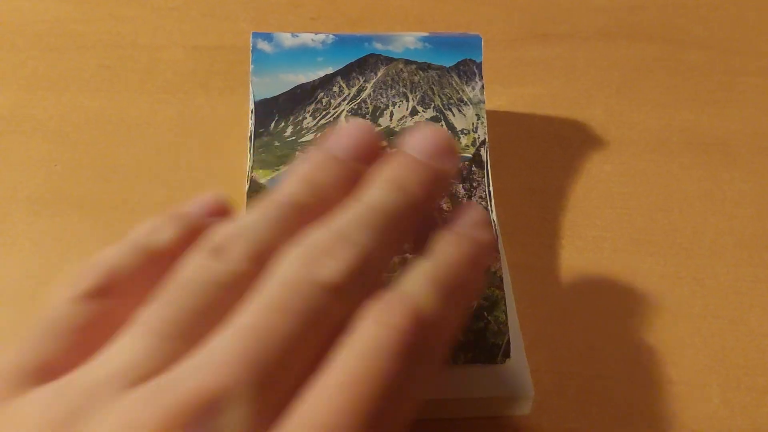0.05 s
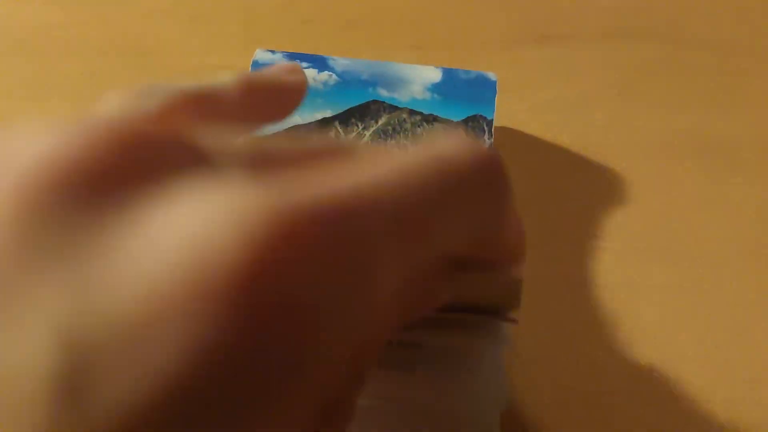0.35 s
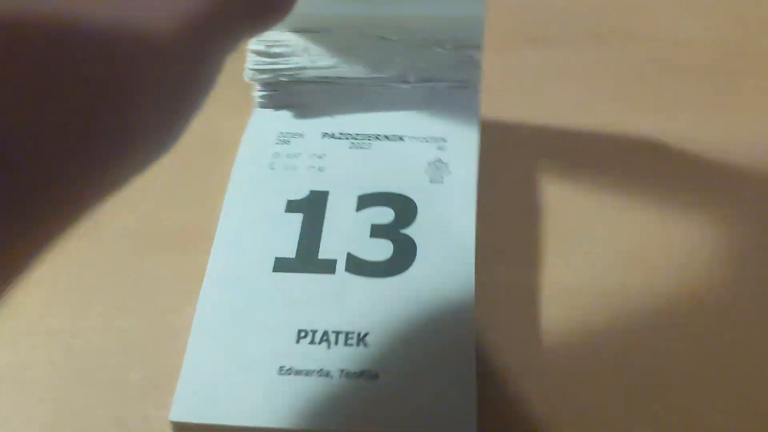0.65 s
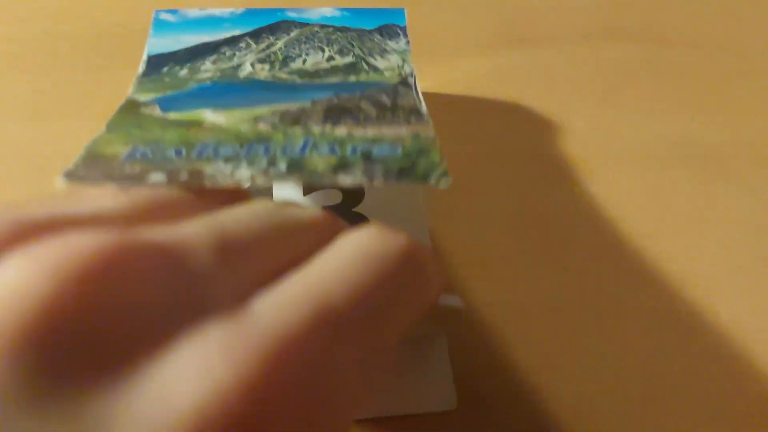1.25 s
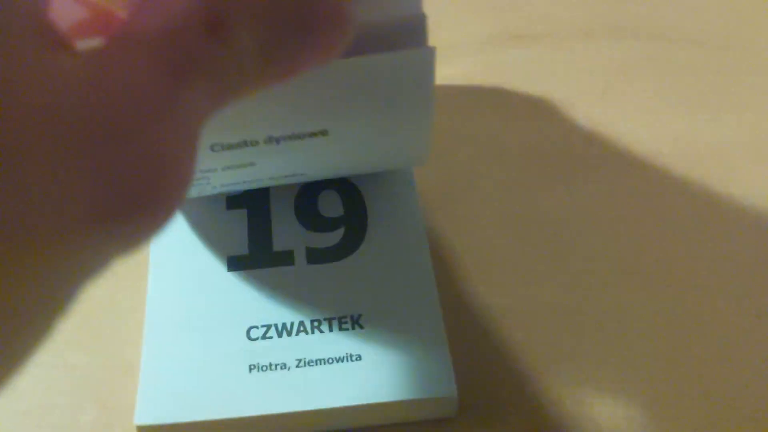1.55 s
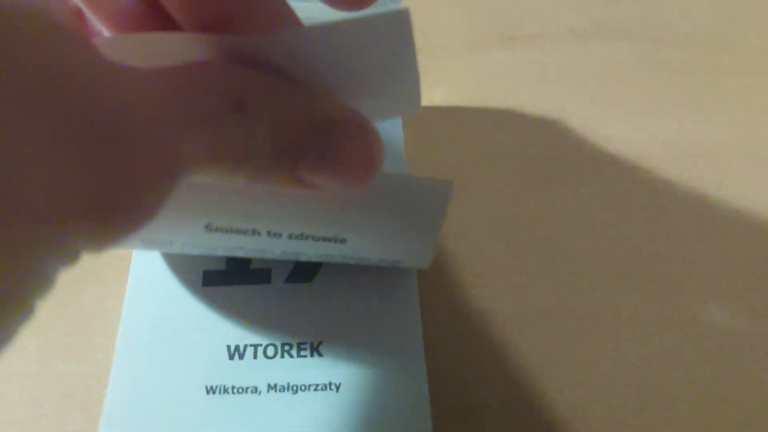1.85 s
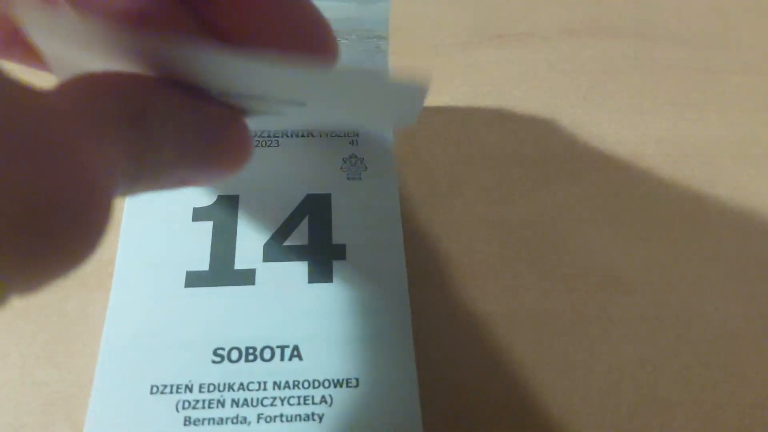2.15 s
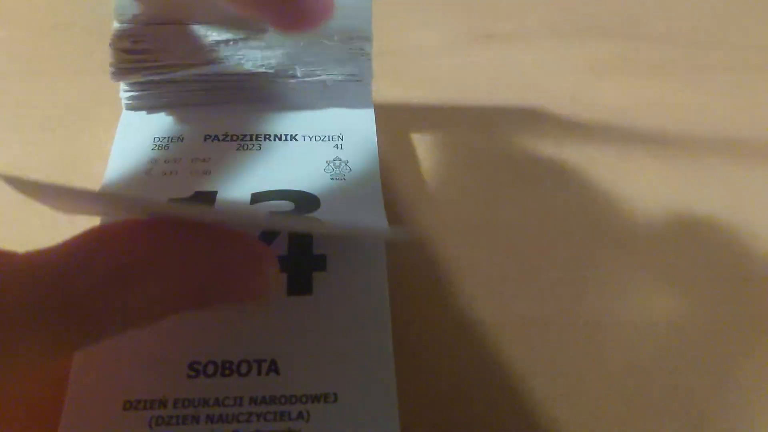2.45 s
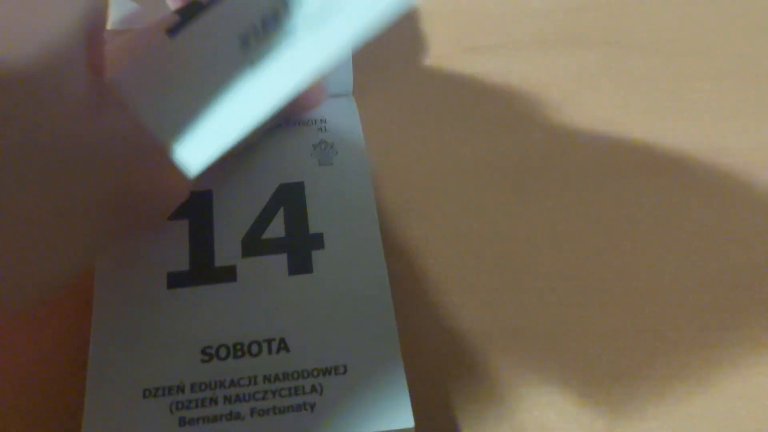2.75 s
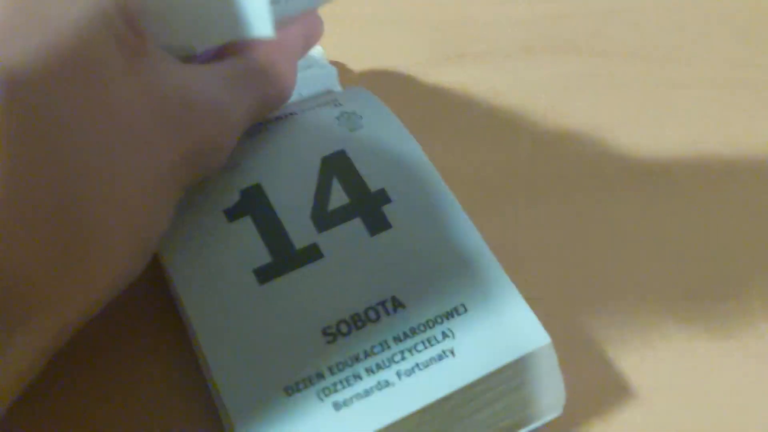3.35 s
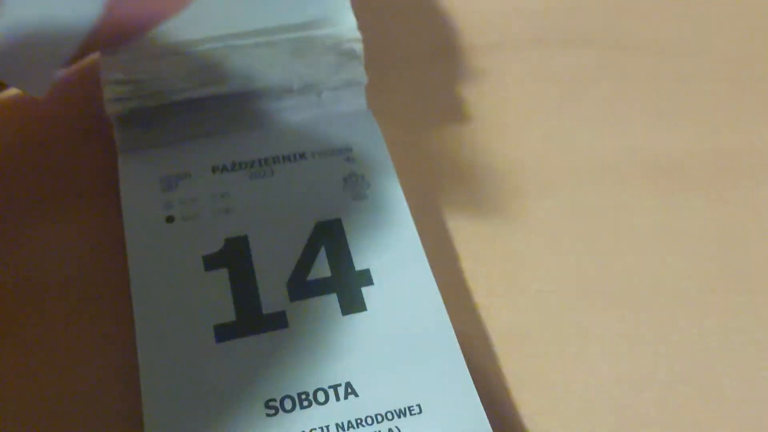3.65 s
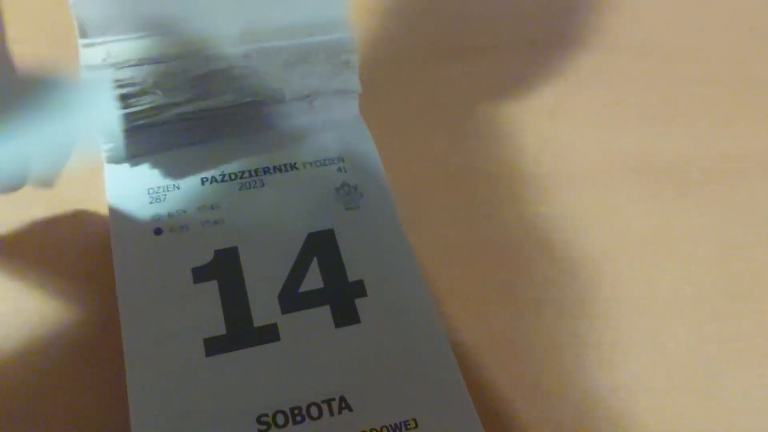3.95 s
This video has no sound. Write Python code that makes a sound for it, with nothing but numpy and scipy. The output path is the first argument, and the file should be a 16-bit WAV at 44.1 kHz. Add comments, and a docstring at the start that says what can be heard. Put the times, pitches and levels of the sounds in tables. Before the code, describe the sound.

Thin paper pages of a tear-off calendar rustle close to the microphone in a small, quiet room. From the start to about 1.2 seconds come soft slides, crisp clicks and light bumps on a wooden table. Pages then swish in uneven strokes until about 3.2. A sheet snaps taut at 3.3 and rips off in a loud crackle from 3.4 to 3.7, sliding free softly around 3.8.

```python
"""In a small room, a tear-off paper calendar is handled on a wooden table, close to a microphone.
Fingers bump the pad, so it thuds and the table rings. They lift the cover and slide through the thin
pages, which rub, hiss and buckle. One sheet is pulled tight, snaps, rips along its binding with a
crackle of breaking fibres and slides free. The microphone has two openings (ports), left and right."""
import sys
import numpy as np
from scipy import signal
from scipy.fft import rfft, irfft, next_fast_len
from scipy.io import wavfile
from scipy.ndimage import map_coordinates

SR = 44100
rng = np.random.default_rng(int(sys.argv[2]) if len(sys.argv) > 2 else 0)


def master_out(mix):
    """Clip the mix to full scale and print it as 16-bit PCM to the path in sys.argv[1]."""
    frames = np.transpose(np.atleast_2d(mix))
    ceiling = np.clip(frames, -1, 1)
    pcm = np.round(ceiling * 32767).astype(np.int16)
    wavfile.write(sys.argv[1], SR, pcm)


N = 176400
T = np.arange(N) / SR

# Levels compare rows within a table. A fade_s is the time a sound takes to drop by 60 dB.
# Tone of the room's air: pitch_hz, level_db
AIR_TONE = [(20, -23.5), (45, 12.5), (70, -2), (130, 1), (200, -10.5), (350, -3.5), (600, -17),
            (1100, -16.5), (1600, -23.5), (2200, -13.5), (3000, -30.5), (4000, -17), (6000, -27),
            (9500, -35), (13000, -23.5), (16000, -31.5)]
# Bumps on the pad and table: start_s, level_db, brightness_hz, thud_fade_s
BUMPS = [(0.07, -49, 90, 0.048), (.163, -43.5, 92, 0.29), (0.22, -53.5, 220, .1), (.557, -49.5, 145.7, 0.3),
         (.735, -35, 606, 0.1), (.752, -36, 1020, 0.069), (.839, -52, 880, 0.045),
         (.964, -38.5, 277.8, 0.15), (1.0, -43.5, 263, 0.37), (1.055, -38.5, 250, 0.086),
         (1.086, -47.5, 180, 0.082), (1.571, -41, 790, 0.17), (1.601, -47, 760, 0.039),
         (1.811, -53, 324, 0.25), (2.222, -50, 960, 0.2), (2.442, -51, 350, 0.055),
         (2.469, -50.5, 890, 0.03), (2.5, -40.5, 474, 0.094), (2.643, -43, 970, 0.086),
         (3.2994, -51, 600, 0.066), (3.372, -21, 580, 0.066), (3.475, -31, 644, 0.074),
         (3.507, -35, 800, 0.043), (3.622, -37, 525, 0.065), (3.636, -32, 710, 0.091)]
# Tone of the pad's thud: pitch_hz, level_db
THUD_TONE = [(25, -38.5), (50, -17), (70, 3), (100, -1), (130, 3), (160, -9.5), (220, 1), (330, 3.5),
             (500, 2.5), (900, 5), (1500, 13.5), (4000, -20.5)]
# Notes at which the table top and pad ring: pitch_hz, level_db, fade_s
TABLE_NOTES = [(74, -23, 0.27), (133, -9.5, 0.24), (172, -30.5, 0.3), (223.5, -7, 0.14),
               (273.7, -17.5, 0.15), (317.8, -11, 0.33), (466, -19.5, 0.069), (631, -16, 0.34),
               (843.4, 0, 0.11), (955, -2, 0.18), (1022, -6, .16)]
# The hand drags on the pad: peak_s, half_length_s, level_db
DRAGS = [(1.504, 0.077, -65), (1.74, 0.14, -67), (2.202, 0.15, -76.5), (2.919, 0.063, -59.5)]
# Tone of that dragging: pitch_hz, level_db
DRAG_TONE = [(120, -14.5), (220, -0.5), (340, 5.5), (430, -14), (600, -23.5), (1500, -33)]
# Sheets sliding: peak_s, rise_s, fall_s, rub_db, ring_hz, ring_db, hiss_db
SLIDES = [(0.149, 0.0062, 0.021, -54.5, 1436, -55, -87), (.25, .05, 0.039, -58, 1383, -64, -68),
          (.365, 0.055, 0.056, -54, 1182, -52, -66), (0.501, 0.028, 0.02, -70, 4050, -68, -63),
          (.6, 0.012, 0.083, -74, 4550, -62.5, -59.5), (.68, 0.079, 0.026, -68, 4270, -83, -58),
          (0.713, 0.01, 0.021, -51, 1155, -41.5, -62.5), (1.039, 0.076, 0.28, -58.5, 4130, -80.5, -64.5),
          (1.244, 0.013, 0.12, -64, 1047, -66, -72), (1.32, 0.0224, 0.034, -57, 3160, -56, -64),
          (1.388, 0.044, 0.031, -42.5, 3400, -41.5, -47), (1.427, 0.022, 0.013, -44.5, 2660, -43.5, -64),
          (1.51, 0.043, 0.085, -55, 2230, -56.5, -58), (1.686, 0.027, 0.036, -42, 3190, -50, -42),
          (1.79, 0.091, 0.049, -50.5, 2150, -97, -47), (1.96, 0.061, 0.042, -51.5, 3250, -65, -52),
          (2.075, 0.066, 0.046, -55, 2413, -55, -48.5), (2.199, 0.051, .045, -44.5, 3090, -48, -45),
          (2.319, 0.024, 0.019, -57, 3290, -54.5, -56.5), (2.55, 0.07, .04, -55.5, 3314, -63, -60.5),
          (2.61, 0.028, 0.045, -59, 3380, -63, -51.5), (2.664, 0.03, 0.039, -50, 3390, -50, -53),
          (2.906, 0.069, 0.043, -50, 2230, -56, -59.5), (3.04, 0.17, 0.096, -54.5, 3460, -66.5, -57.5),
          (3.22, 0.075, 0.093, -61.5, 3410, -65, -62.5), (3.331, .012, 0.024, -43.5, 3740, -46, -48),
          (3.81, 0.055, 0.041, -48, 3860, -58.5, -49)]
# Tone of paper rubbing: pitch_hz, level_db
RUB_TONE = [(100, -10.5), (350, -11.5), (600, -8.5), (1100, 3), (1600, 1), (2250, 7), (2800, -2.5),
            (3400, -2), (4200, -3), (5200, 5.5), (7500, -14.5), (16000, -39.5)]
# Tone of the paper's fine hiss: pitch_hz, level_db
HISS_TONE = [(2000, -18.5), (4500, -2), (6500, -15.5), (8200, -2.5), (9500, -12), (12000, -2.5),
             (15500, -0.5), (17000, -2)]
# The paper buckles or gives way:
# start_s, crack_db, crack_fade_s, pop_hz, pop_db, tick_db, left_treble (0 to 1)
SNAPS = [(0.1446, -52, 0.014, 1440, -40, -75, 0.2), (.5578, -29, 0.015, 2930, -20.5, -31.5, 1),
         (.705, -47, 0.062, 1900, -37, -64, 0.2), (0.7372, -42, .015, 1260, -28, -62, 0.1),
         (.9557, -53, 0.012, 900, -46.5, -58, 0.4), (.9787, -44, .01, 8300, -50, -33, 0.94),
         (1.0545, -50, 0.037, 1370, -34, -65, 0.3), (1.224, -58, 0.024, 1080, -45, -63, 0),
         (1.5728, -49, 0.014, 1120, -32.5, -72, 0.5), (1.7622, -48, 0.045, 1860, -26, -61, 0.9),
         (1.8, -39.5, 0.019, 1110, -68, -42, 1), (2.47, -52, 0.022, 694, -41, -65, 0.7),
         (2.5007, -43, 0.02, 850, -33, -56, 0), (2.9916, -41, 0.022, 3500, -23, -62, .3),
         (3.245, -50.5, 0.03, 3000, -55.5, -50, 0.9), (3.2988, -20, 0.02, 2980, -28, -19.5, 1),
         (3.3709, -12.5, 0.039, 896, -5, -3, .7), (3.4579, -29.5, 0.016, 4030, -31.5, -24, .4),
         (3.465, -39, 0.011, 3950, -22.5, -32, .4), (3.4752, -17, 0.015, 2350, -4, -17.5, 0.1),
         (3.4864, -29.5, 0.019, 1400, -10.5, -30.5, .3), (3.5066, -18, 0.019, 1400, -8.5, -22.5, 1),
         (3.54, -35, .012, 3530, -26.5, -21, 0.8), (3.597, -30.5, 0.015, 4020, -34, -18, 0.65),
         (3.6058, -18.5, 0.012, 3330, -33, -5.5, 0.3), (3.617, -30.5, 0.043, 4550, -26, -25.5, 1),
         (3.6247, -55, 0.015, 3900, -13.5, -22, 0.8), (3.6333, -34, 0.045, 1026, -15.5, -26, 0.5),
         (3.6943, -36.5, .025, 2500, -27, -33, 0.5), (3.771, -45, 0.017, 1185, -34, -56, 0.1)]
# Tone of a snap's bright tick: pitch_hz, level_db
TICK_TONE = [(3000, -32), (5500, -26), (7500, 4), (9500, -10), (12000, -2), (16000, 7.5)]
# Tone of a snap's crack: pitch_hz, level_db
CRACK_TONE = [(40, -32.5), (130, -21), (400, -5), (1200, 2), (2500, 6.5), (4200, 4), (6000, 0.5),
              (8000, -8.5), (9500, -20), (12000, -5), (16000, -27)]
# How late a snap reaches the right port as the fingers move: time_s, delay_ms
SNAP_DELAYS = [(.14, 0.25), (.56, .2), (.74, 0.12), (.98, 0.053), (1.3, 0.23), (2.6, .29), (3, 0.33),
               (3.3, 0.28), (3.37, .18), (3.46, 0.326), (3.8, 0.3)]
# Loudness along the rip: time_s, level_db
RIP_LEVELS = [(3.37, -67), (3.385, -23), (3.42, -42.5), (3.445, -38), (3.49, -30.5), (3.53, -39),
              (3.56, -36), (3.59, -40), (3.63, -26), (3.66, -44), (3.7, -48), (3.73, -56), (3.78, -68)]
# Tone of breaking fibres: pitch_hz, level_db
FIBRE_TONE = [(80, -34.5), (300, -2.5), (700, 1.5), (1200, 8), (2500, -4), (4200, 13), (6000, 3),
              (8000, -3.5), (9500, -8), (12500, 2.5), (16000, 0.5)]
# The left port's extra treble when left_treble is 1: pitch_hz, left_minus_right_db
LEFT_TREBLE = [(4500, -0.5), (6500, 10), (9000, 14), (15000, 1.5)]
# How the two ports colour every sound: pitch_hz, left_minus_right_db
PORT_BALANCE = [(60, 3), (140, 6), (300, -0.5), (800, 3), (1300, -2), (2000, -5.5), (3000, -6.5),
                (4400, -7), (5500, 1)]
# Length of the room's echo: pitch_hz, fade_s
ECHO_FADES = [(80, 0.22), (300, 0.38), (1000, 0.23), (4000, 0.26), (9000, 0.37), (16000, 0.22)]
# Tone of the room's echo: pitch_hz, level_db
ECHO_TONE = [(80, -3.5), (400, -5), (1500, -7), (4000, -6.5), (8000, -9), (15000, -7.5)]

SIDES = np.array([[.5], [-.5]])  # splits an effect: half up on the left, half down on the right


def amp(db):
    """Turn decibels into a number to multiply by."""
    return 10 ** (np.asarray(db) / 20)


def unit(x):
    """Scale a sound to an average (rms) size of 1."""
    return x / np.sqrt(np.mean(x ** 2) + 1e-20)


def along(table, hz):
    """Read between the rows of a table, on a musical (log) pitch scale."""
    pitches, values = np.transpose(table)
    return np.interp(np.log(hz + 1), np.log(pitches + 1), values)


def tone(table):
    """Turn a tone table into a curve that gives the gain at each pitch."""
    return lambda f: amp(along(table, f))


def filtered(x, curve):
    """Turn each pitch in a sound up or down by a curve."""
    n = x.shape[-1]
    padded = next_fast_len(n + 4096)
    return irfft(rfft(x, padded) * curve(np.fft.rfftfreq(padded, 1 / SR)), padded)[..., :n]


def noise(curve, size=N):
    """Steady noise shaped by a curve."""
    return unit(filtered(rng.standard_normal(size), curve))


def burst(curve, fade_s, size):
    """A dying puff of noise, evened out across pitch and then shaped by a curve."""
    fade = amp(-60 * T[:size] / fade_s)
    spectrum = rfft(np.pad(fade * rng.standard_normal(size), (0, size)))
    even = spectrum / (np.abs(spectrum) + 1e-12)
    puff = irfft(even * curve(np.fft.rfftfreq(2 * size, 1 / SR)))[:size] * fade ** 0.033
    return puff * np.linalg.norm(fade) / np.linalg.norm(puff)


def wobble(per_s):
    """A smooth line through per_s random values each second."""
    return map_coordinates(rng.standard_normal(N // 8), [T * per_s], mode="wrap")


def add(track, start_s, x):
    """Mix a sound into the track at start_s, or at 0 if that is negative."""
    part = track[..., max(round(start_s * SR), 0):][..., :x.shape[-1]]
    part += x[..., :part.shape[-1]]


def ports(x, delay_ms, left_treble):
    """Make a sound stereo: the right port hears it later and with less treble."""
    balance = lambda f: amp(SIDES * left_treble * along(LEFT_TREBLE, f))
    delay = lambda f: np.exp(2j * np.pi * SIDES * f * delay_ms / 1000)
    return filtered(x, lambda f: balance(f) * delay(f))


def room_air():
    """Quiet air in the room, partly shared by both ports."""
    shared, left, right = [noise(tone(AIR_TONE)) for _ in range(3)]
    return amp(-65) * unit(shared + 1.1 * np.array([left, right]))


def hand_on_pad():
    """Bumps make the pad thud and the table ring, duller when soft; a dragging hand adds a low rub."""
    t = T[:SR // 2]
    drag_level = sum(amp(db) * np.exp(-((T - peak_s) / half_s) ** 4) for peak_s, half_s, db in DRAGS)
    out = noise(tone(DRAG_TONE)) * drag_level
    attack = 1 - np.exp(-t / 0.00018)
    for start_s, level_db, brightness_hz, fade_s in BUMPS:
        soften = lambda f: 1 / (1 + (f / brightness_hz) ** 3)
        thud = amp(-3.5) * burst(lambda f: tone(THUD_TONE)(f) * soften(f), fade_s, len(t))
        ring = np.zeros(len(t))
        for hz, note_db, note_fade_s in TABLE_NOTES:
            fade = amp(note_db - 5 + rng.normal(0, 0.53) - 60 * t / note_fade_s)
            ring += soften(hz) * fade * np.sin(2 * np.pi * (hz * t + rng.random()))
        add(out, start_s, amp(level_db) * (thud + ring) * attack)
    return ports(out, delay_ms=0.16, left_treble=0.77)


def sheet_ring(hz, sharpness=9, sink_octaves_per_s=.5):
    """One second of a bent sheet's noisy note, which sinks as the sheet slides out."""
    slow = lambda f: 1 / (1 + (2 * sharpness * f / hz) ** 1.14) * (f < .9 * hz)
    wander = noise(slow, size=(2, SR))  # blurs the note into a band of noise
    pitch_hz = hz * 2 ** (-sink_octaves_per_s * (T[:SR] - .5))
    phase = 2 * np.pi * np.cumsum(pitch_hz) / SR
    return wander[0] * np.cos(phase) + wander[1] * np.sin(phase)


def sliding_sheets():
    """Each sliding sheet swells and fades: a grainy rub, the ring of bent paper and a fine hiss."""
    rub_power, ring, hiss_power = np.zeros((3, N))
    for peak_s, rise_s, fall_s, rub_db, ring_hz, ring_db, hiss_db in SLIDES:
        width_s = np.where(T < peak_s, rise_s, fall_s)
        swell = np.exp(-np.abs((T - peak_s) / width_s) ** 3.83)  # a flat top and a quick stop
        rub_power += swell * amp(rub_db) ** 2
        hiss_power += swell * amp(hiss_db) ** 2
        sheet = np.zeros(N)
        add(sheet, peak_s - .5, sheet_ring(ring_hz))
        ring += np.sqrt(swell) * amp(ring_db) * sheet
    rub = np.sqrt(rub_power) * noise(tone(RUB_TONE))
    hiss = np.sqrt(hiss_power) * noise(tone(HISS_TONE))
    roughness = unit(amp(2.2 * wobble(per_s=430) + wobble(per_s=35.19)))
    return ports(amp(-4.5) * (ring + rub + hiss) * roughness, delay_ms=0.28, left_treble=1.0)


def paper_snaps(pop_cycles=10.5):
    """Paper buckles or gives way: a bright tick, a short crack and a pop as the sheet flexes."""
    out, t = np.zeros((2, N)), T[:SR // 10]
    crack_attack = 1 - np.exp(-t / 0.0001)
    pop_attack = 1 - np.exp(-t / 0.00011)
    for start_s, crack_db, crack_fade_s, pop_hz, pop_db, tick_db, left_treble in SNAPS:
        tick = amp(tick_db) * burst(tone(TICK_TONE), fade_s=0.011, size=len(t))
        crack = amp(crack_db) * burst(tone(CRACK_TONE), crack_fade_s, len(t))
        pop = np.sin(2 * np.pi * pop_hz * t) * amp(pop_db - 60 * t * pop_hz / pop_cycles)
        snap = (tick + crack) * crack_attack + pop * pop_attack
        delay_ms = np.interp(start_s, *np.transpose(SNAP_DELAYS))
        add(out, start_s, ports(snap, delay_ms, left_treble))
    return out


def paper_rip(breaks_per_s=3500, size_spread_db=4):
    """Fibres break one after another, in clumps, as the tear runs along the binding."""
    breaks = (rng.random(N) < breaks_per_s / SR) * rng.choice([-1, 1], N)
    sizes = amp(size_spread_db * np.minimum(rng.exponential(size=N), 4))
    clumps = amp(4.7 * wobble(per_s=260))
    crackle = unit(filtered(breaks * sizes * clumps, tone(FIBRE_TONE)))
    level_db = np.interp(T, *np.transpose(RIP_LEVELS), left=-150, right=-150)
    return ports(crackle * amp(level_db), delay_ms=0.367, left_treble=0.21)


def room(x, echo_db):
    """Add the room's short, blurred echo, different at each port."""
    hz, t, spectrum = signal.stft(rng.standard_normal((2, SR // 2)), SR, nperseg=256)
    fade_s = along(ECHO_FADES, hz)[:, None]
    fade = amp(along(ECHO_TONE, hz)[:, None] - 60 * t / fade_s)
    same_energy = np.sqrt(2 * np.log(1000) / (fade_s * SR))  # a longer echo is no stronger
    echo = signal.istft(spectrum * fade * same_energy, SR, nperseg=256)[1]
    echo[:, :SR // 500] = 0  # no echo for the first 2 ms
    return x + amp(echo_db) * signal.fftconvolve(x, echo, axes=1)[:, :N]


def scene():
    """The hand, the paper and the table, heard in the room."""
    slides = room(sliding_sheets(), echo_db=2)
    snaps = room(paper_snaps(), echo_db=0.5)
    bumps = room(hand_on_pad(), echo_db=-6.5)
    rip = room(paper_rip(), echo_db=1.5)
    return room_air() + bumps + slides + snaps + rip


def record(dry):
    """The microphone comes on, colours each side, rounds off peaks and drops the lowest and top pitches."""
    on_s, low_hz, top_hz, ceiling = 0.069, 53, 15950, .8
    switched_on = dry * np.clip((T - on_s) / 0.0067, 0, 1)
    bass_cut = lambda f: -f ** 2 / (low_hz ** 2 - f ** 2 + 1j * f * low_hz)
    coloured = filtered(switched_on, lambda f: amp(SIDES * along(PORT_BALANCE, f)) * bass_cut(f))
    rounded = coloured / (1 + (coloured / ceiling) ** 6) ** (1 / 6)
    return filtered(rounded, lambda f: 1 / (1 + (f / top_hz) ** 160))


dry = scene()
out = record(dry)
master_out(out)
```